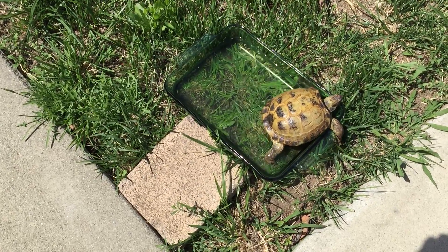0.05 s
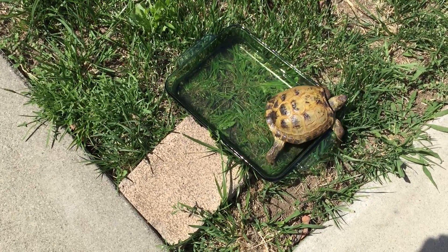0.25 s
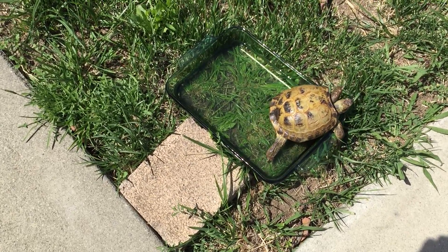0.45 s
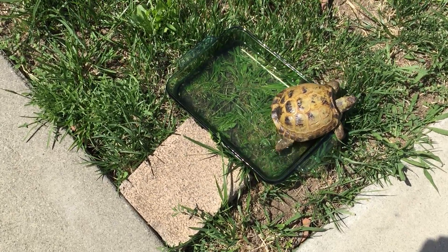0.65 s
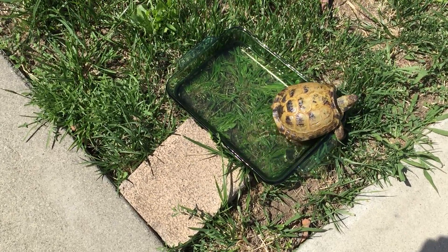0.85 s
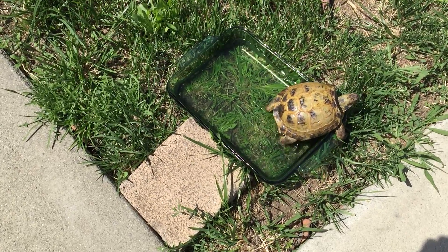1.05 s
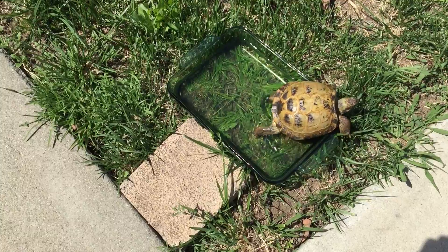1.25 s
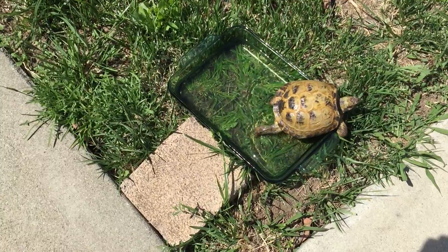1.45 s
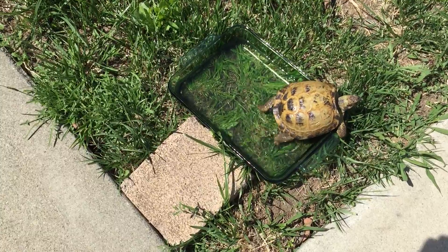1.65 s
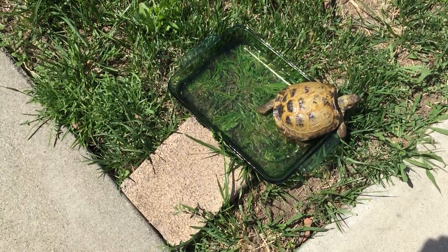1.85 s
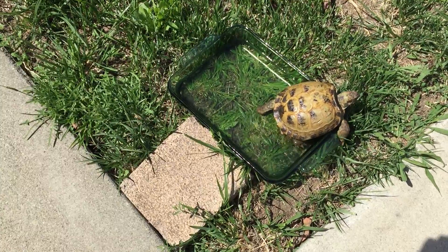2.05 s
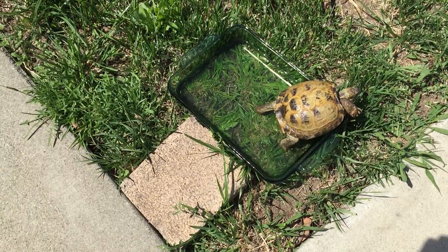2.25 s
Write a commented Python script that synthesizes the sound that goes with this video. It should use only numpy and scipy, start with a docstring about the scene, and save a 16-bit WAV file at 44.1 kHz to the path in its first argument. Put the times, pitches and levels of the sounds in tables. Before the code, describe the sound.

A tortoise's claws click quickly on a plastic pan, ending in a shell knock, while wind buffets the close microphone. A softer knock and one more click follow over a low breeze outdoors.

```python
"""A tortoise clambers over the rim of a pan of water on a lawn, close to the microphone.
Its claws click on the pan and its shell knocks against it twice; each impact excites the same damped
modes, weighted by the place and hardness of the contact. The grass ticks faintly as it moves.
Wind eddies buffet the microphone, hardest during the first clicks, over a faint outdoor hush
and the even chirps of a far insect."""
import sys
import numpy as np
from scipy import signal
from scipy.fft import rfft, irfft
from scipy.io import wavfile
from scipy.ndimage import uniform_filter1d

SR = 44100
rng = np.random.default_rng(int(sys.argv[2]) if len(sys.argv) > 2 else 0)


def wav_out(sig):
    """Save sig, one row per channel (or a flat mono array), as 16-bit PCM at SR to the path in sys.argv[1]."""
    wavfile.write(sys.argv[1], SR, np.round(np.clip(np.atleast_2d(sig).T, -1, 1) * 32767).astype(np.int16))


N = 101429


def amp(db):
    """The decibel law: amplitude grows tenfold every 20 dB."""
    return 10 ** (np.asarray(db) / 20)


def unit(x):
    """Normalisation: dividing by the rms gives unit power."""
    return x / np.sqrt(np.mean(x ** 2) + 1e-20)


def add(mix, start_s, sound):
    """Superposition: a sound adds linearly to the mix from its start time on."""
    part = mix[round(start_s * SR):][:len(sound)]
    part += sound[:len(part)]


def noise(spectrum, size):
    """Spectral shaping: white noise takes on the given spectrum, at unit rms."""
    hz, db = np.transpose(spectrum)
    f = np.fft.rfftfreq(size, 1 / SR)
    gain = amp(np.interp(np.log(f + 1), np.log(hz), db))
    return unit(irfft(rfft(rng.standard_normal(size)) * gain, size))


def band(x, low_hz, high_hz, high_poles, low_poles=3.97):
    """Minimum-phase band-pass: the Hilbert transform of the log gain gives a causal phase."""
    size = 2 * len(x)
    f = abs(np.fft.fftfreq(size, 1 / SR)) + 1
    low_loss = np.log1p((low_hz / f) ** (2 * low_poles))
    high_loss = np.log1p((f / high_hz) ** (2 * high_poles))
    log_gain = np.maximum(-.5 * (low_loss + high_loss), -9)
    response = np.exp(np.conj(signal.hilbert(log_gain)))[:len(x) + 1]
    return irfft(rfft(x, size) * response)[:len(x)]


def hush(level_db=-65.5, drift_db=.7):
    """Random modulation: distant outdoor noise drifts in faint patches of time and frequency."""
    # spectrum of the hush (frequency [Hz], relative density [dB])
    spectrum = [(30, -2), (250, 6), (500, -2.5), (1000, -0.5), (1600, -6), (3000, -12), (6000, -16.5),
                (9000, -20), (10500, -22.5), (16500, -23.5)]
    spectrogram = signal.stft(noise(spectrum, N), nperseg=512)[2]
    patches = uniform_filter1d(rng.standard_normal(spectrogram.shape), size=8, axis=0)
    patches = unit(uniform_filter1d(patches, size=14, axis=1))
    drifting = signal.istft(spectrogram * amp(drift_db * patches))[1][:N]
    return amp(level_db) * unit(drifting)


def insect(level_db=-84, pitch_hz=7400, width_hz=190):
    """Amplitude modulation: a far insect's narrow-band buzz is gated into evenly spaced chirps."""
    first_s, period_s, length_s = .054, .1465, .045
    t, f = np.arange(N) / SR, np.fft.rfftfreq(N, 1 / SR)
    from_centre_s = (t - first_s + period_s / 2) % period_s - period_s / 2
    gate = np.exp(-(2 * from_centre_s / length_s) ** 4)
    passband = np.exp(-((f - pitch_hz) / width_hz) ** 2)
    buzz = irfft(rfft(rng.standard_normal(N)) * passband, N)
    return amp(level_db) * gate * unit(buzz)


def wind(smoothing_s=.038, steadiness=.64):
    """Turbulent pressure: eddies on the microphone make a low breeze, one gust and sharp buffets."""
    # envelopes of the breeze and the gust (time [s], level [dB])
    breeze = [(0, -71.5), (.06, -42), (.15, -62.5), (.58, -60.5), (.72, -58), (.85, -47), (.98, -45),
              (1.05, -49.5), (1.2, -47), (1.32, -46), (1.4, -44.5), (1.55, -47), (1.635, -40.5),
              (1.68, -47), (1.85, -48.5), (2.07, -44.5), (2.3, -47)]
    gust = [(.15, -101), (.185, -46.5), (.222, -44.5), (.24, -33), (.265, -29), (.305, -28), (.335, -42.5),
            (.355, -37.5), (.383, -25), (.41, -37), (.45, -37.5), (.475, -30), (.52, -43), (.58, -79)]
    # spectra of their rumble (frequency [Hz], relative density [dB])
    breeze_rumble = [(10, -45), (25, -25.5), (50, 0.5), (75, 3), (115, -6), (165, -13), (240, -26),
                     (320, -30), (400, -40), (1000, -56)]
    gust_rumble = [(10, -38), (25, -25), (50, -3), (75, 2.5), (120, -2), (170, -16), (250, -21),
                   (320, -31.5), (400, -47), (520, -59), (1000, -93)]
    # pressure swings (time [s], envelope peak [dB], centre [Hz], narrowness [2 pops, 15 flutters])
    buffets = [(0.182, -42, 214, 35), (0.229, -39.5, 241, 13), (0.4267, -14, 109.3, 1.56),
               (0.478, -23, 103, 6.8)]
    t, out = np.arange(N) / SR, np.zeros(N)
    for envelope, spectrum in ((breeze, breeze_rumble), (gust, gust_rumble)):
        eddies = noise(spectrum, N)
        power = uniform_filter1d(abs(signal.hilbert(eddies)) ** 2, int(smoothing_s * SR))
        steadied = unit(eddies / power ** (steadiness / 2))
        out += steadied * amp(np.interp(t, *np.transpose(envelope)))
    for centre_s, db, hz, narrowness in buffets:
        wavelet = (1 - 2j * np.pi * hz * (t - centre_s) / narrowness) ** -(narrowness + 1)
        out += amp(db) * wavelet.imag
    return out


def grass_ticks(t60_s=.063):
    """Exponential decay: tiny bursts of high noise die away as the tortoise moves in the grass."""
    # dry ticks (time [s], level [dB])
    ticks = [(1.018, -68), (1.177, -74), (1.267, -74), (1.522, -75), (1.688, -79)]
    t, out = np.arange(SR // 20) / SR, np.zeros(N)
    for start_s, db in ticks:
        burst = band(rng.standard_normal(len(t)), low_hz=4450, high_hz=14000, high_poles=1.6)
        add(out, start_s, amp(db - 60 * t / t60_s) * unit(burst))
    return out


def pan_strike(gain_db, low_hz, high_hz, rise_s, spot, high_poles):
    """Modal ringing: a blow cracks, clatters and excites each mode according to the spot struck."""
    # modes of the pan (frequency [Hz], relative level [dB], T60 [s])
    modes = [(473, -27, .115), (785, -40, .08), (912, -29, .08), (1214, -41, .11), (1323, -36, .085),
             (1420, -41, .12), (1857, -45, .08), (1977, -37, .115), (2145, -50, .11), (2400, -48, .09),
             (2665, -47, .11), (2698, -45, .12), (3353, -46, .09), (3733, -49, .125), (4238, -49, .1),
             (5360, -51, .1), (5528, -51, .07), (6000, -53, .1), (6562, -56, .08), (6743, -58, .1),
             (7361, -56, .1), (7908, -49, .09), (8312, -53, .08), (9281, -41, .075), (9400, -52, .08),
             (10430, -59, .08), (11400, -57, .07), (12040, -53, .085), (14120, -53, .055)]
    # its crowd of weak, quickly damped modes (frequency [Hz], relative density [dB])
    clatter_spectrum = [(200, -14), (400, -3), (1200, 12.5), (1650, 9), (2600, 7), (4500, -6),
                        (9000, -13.5), (13000, -10), (17000, -28)]
    # the instant of contact (frequency [Hz], relative density [dB])
    crack_spectrum = [(200, -9), (500, -32), (1400, 13), (2700, 7.5), (5000, -9), (10000, 1.5), (15000, 5),
                      (17000, 2)]
    ring_gain_db, clatter_gain_db, crack_gain_db, spot_depth_db = -.5, -39, -34, 4.5
    clatter_t60_s, crack_t60_s = .094, .02
    t = np.arange(SR // 4) / SR
    fade = -np.log(1000) * t  # exp(fade / T60) falls 60 dB in T60
    hz, db, t60_s = np.transpose(modes)[:, :, None]
    mode_number = 1 + np.arange(len(hz))[:, None]
    share = amp(ring_gain_db + db + spot_depth_db * np.cos(2 * np.pi * mode_number * spot))
    phase = 2 * np.pi * (hz * t + rng.random(hz.shape))
    ring = (share * np.exp(fade / t60_s) * np.sin(phase)).sum(0)
    clatter = amp(clatter_gain_db) * np.exp(fade / clatter_t60_s) * noise(clatter_spectrum, len(t))
    crack = amp(crack_gain_db) * np.exp(fade / crack_t60_s) * noise(crack_spectrum, len(t))
    attack = np.minimum(t / rise_s, 1)
    return amp(gain_db) * band((ring + clatter + crack) * attack, low_hz, high_hz, high_poles)


def tortoise():
    """Impact bandwidth: hard claws excite the pan's high modes, the broad shell its low ones."""
    # blows (time [s], gain [dB], low edge [Hz], high edge [Hz], rise [s], spot along the rim [0-1])
    claw_clicks = [(.2953, -18, 2130, 3840, 0.0027, .38), (.3212, -14, 3370, 8000, 0.0021, 0.01),
                   (.3527, -7, 3500, 7360, 0.0043, 0), (.3709, 2.5, 3130, 11200, 0.0015, .172),
                   (.4035, -7, 2960, 10000, 0.0015, .196), (.4474, 1, 3140, 13000, 0.0026, 0.01),
                   (.4825, -15, 2210, 8100, 0.0024, .364), (1.4772, -11.5, 3500, 9200, 0.0017, 0.1)]
    shell_knocks = [(.5268, -3, 367, 4530, 0.0015, .346), (1.3445, -25.5, 790, 2600, 0.0034, .34),
                    (1.3642, -15.5, 290, 3600, 0.0012, .31)]
    out = np.zeros(N)
    for blows, high_poles in ((claw_clicks, 3.0), (shell_knocks, 3.64)):
        for start_s, *blow in blows:
            add(out, start_s, pan_strike(*blow, high_poles))
    return out


def scene():
    """Superposition: the pressures of all sources sum at one microphone."""
    return (tortoise() + grass_ticks() + wind() + insect() + hush())[None]


def record(dry, cutoff_hz=17200):
    """Band limiting: a linear-phase low-pass removes the highest treble."""
    lowpass = signal.firwin(255, cutoff_hz, window=("kaiser", 8), fs=SR)
    return signal.oaconvolve(dry, lowpass[None], "same")


dry = scene()
out = record(dry)
wav_out(out)
```